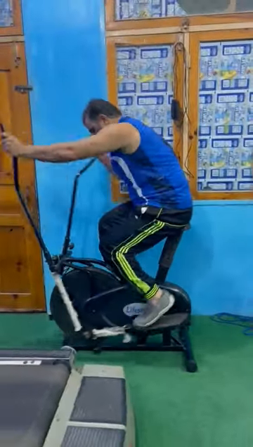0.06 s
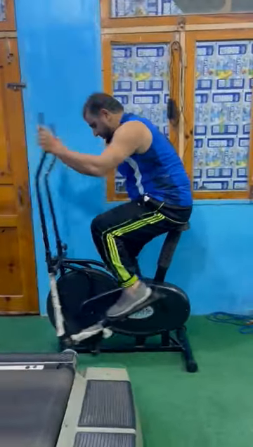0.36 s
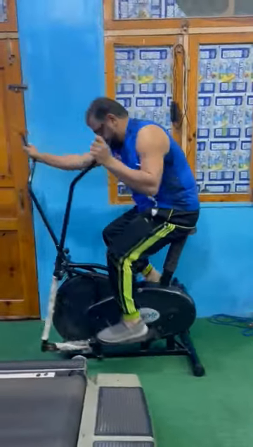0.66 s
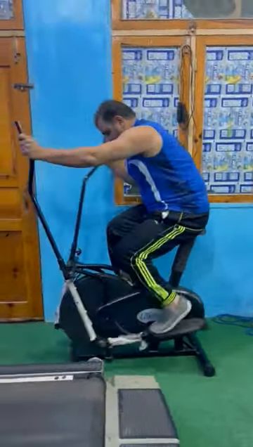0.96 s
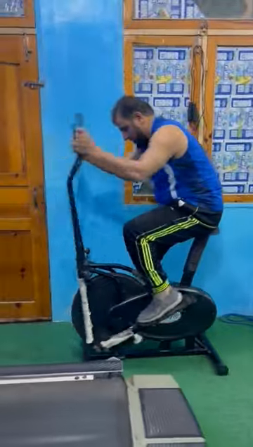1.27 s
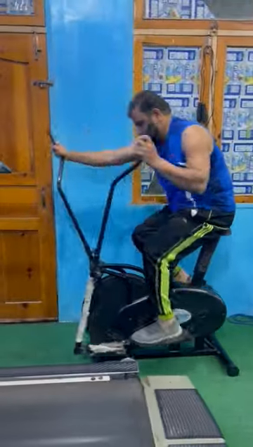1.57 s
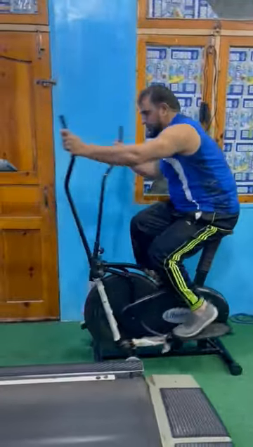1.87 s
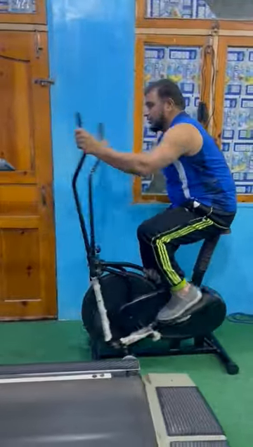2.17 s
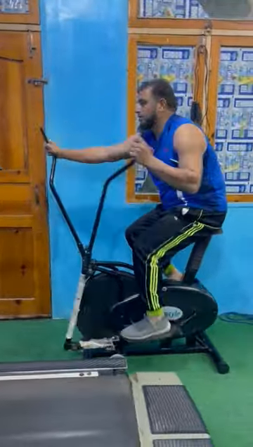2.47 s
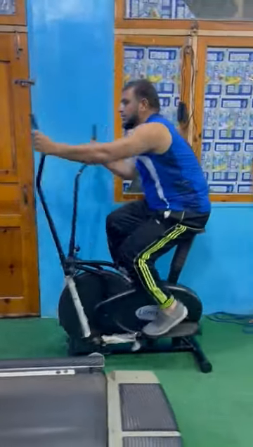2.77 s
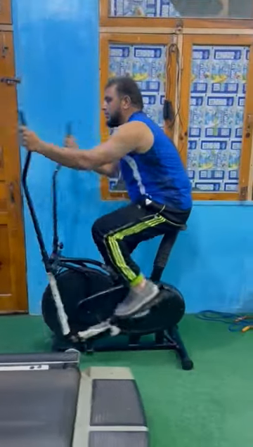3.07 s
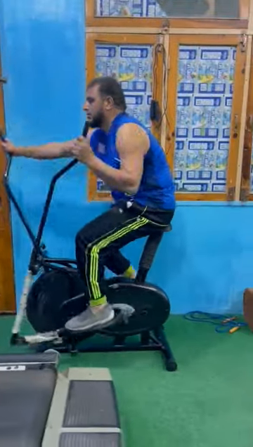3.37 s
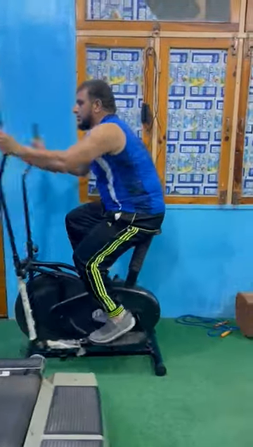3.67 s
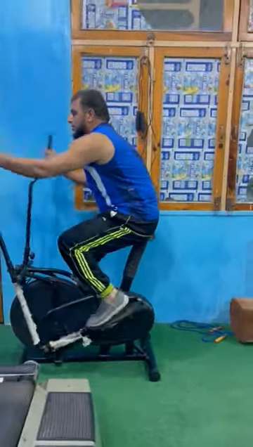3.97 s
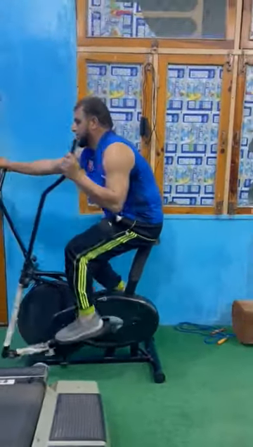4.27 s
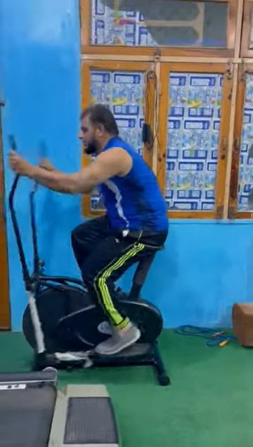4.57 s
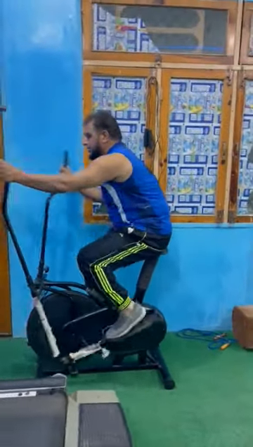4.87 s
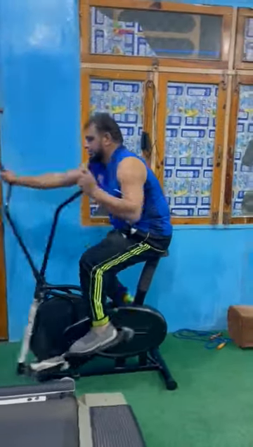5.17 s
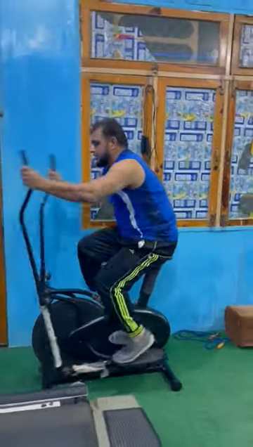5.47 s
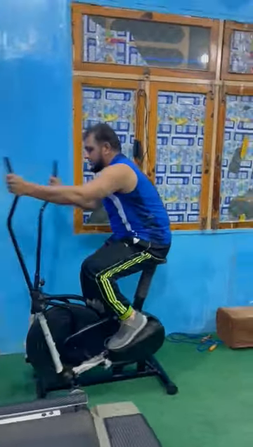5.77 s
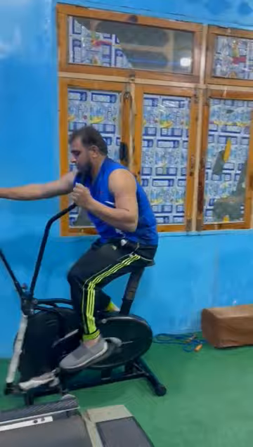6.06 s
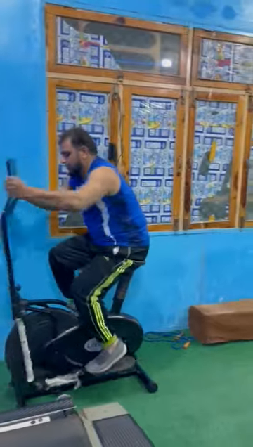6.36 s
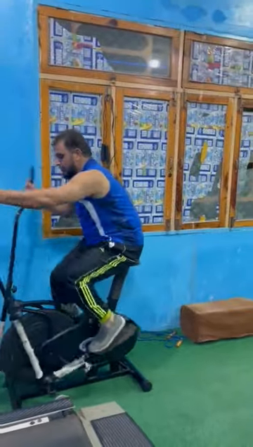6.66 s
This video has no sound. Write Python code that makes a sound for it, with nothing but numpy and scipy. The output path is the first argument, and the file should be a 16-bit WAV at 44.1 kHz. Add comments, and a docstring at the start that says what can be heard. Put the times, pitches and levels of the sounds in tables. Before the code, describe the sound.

An exercise bike is pedalled steadily in a small gym, its flywheel whirring with rapid scrapes, ticks and occasional knocks.

```python
"""Exercise bike in a small gym

Steady pedalling, close to a stereo microphone pair; the flywheel turns nearly seven times a second.
On every turn the out-of-true rim scrapes the brake strap and the drive ticks in an uneven four.
The wheel guard clacks, the pedal linkage knocks, the chain rumbles and sizzles, the frame drones.
A short room tail sits behind the bike, and a few small pops sound right at the microphones."""
import sys
import numpy as np
from scipy import signal
from scipy.fft import rfft, irfft, next_fast_len
from scipy.io import wavfile
from scipy.ndimage import uniform_filter1d, map_coordinates

SR = 44100
rng = np.random.default_rng(int(sys.argv[2]) if len(sys.argv) > 2 else 0)


def unload_wav(signal):
    """Save mono or channel-first audio to the path in sys.argv[1] as 16-bit WAV at rate SR, clipped to [-1, 1]."""
    wavfile.write(
        sys.argv[1],
        SR,
        np.round(np.clip(np.atleast_2d(signal).T, -1, 1) * 32767).astype(np.int16),
    )


N = 304683


# how hard the strap bears on the rim: time_s, level_db
STRAP_LEVEL = [(0.0, -36.5), (0.6, -35.5), (1.0, -40.5), (1.2, -36), (1.6, -36), (2.2, -39), (2.5, -34.5),
               (2.7, -38), (3.4, -37.5), (3.7, -36.5), (3.9, -36.5), (5.2, -36.5), (5.9, -39.5),
               (6.9, -37.5)]
# colour of the scrape at the rim: frequency_hz, level_db
SCRAPE_SPECTRUM = [(300, 1), (800, 3.5), (2500, -9.5), (3200, -4), (4500, -5), (5500, -5), (6100, 0.5),
                   (6600, -1.5), (7300, 6), (8100, -4.5), (9500, -25.5), (10600, 4), (11800, -49)]
def strap_scrape():
    """Friction on the strap: a sharp swish at the rim's high spot, a softer one later in the turn."""
    angle = wheel_angle()
    scrape_db, = curves(STRAP_LEVEL)
    high_spot = rim_pressure(angle, centre_turns=0, width_turns=0.086)
    soft_spot = amp(-9.5) * rim_pressure(angle, centre_turns=0.4, width_turns=0.17)
    grit = unit(amp(0.49 * wobble(980)))
    friction = flickering_noise(depth_db=1.0) * grit * (high_spot + soft_spot)
    return coloured(friction * amp(scrape_db), SCRAPE_SPECTRUM)


def rim_pressure(angle, centre_turns, width_turns):
    """A bump on the rim presses into the strap once a turn."""
    return np.exp(-np.abs((angle - centre_turns + .5) % 1 - .5) / width_turns)


# pace of the flywheel: time_s, turns_per_s
WHEEL_SPEED = [(0.0, 6.613), (1.67, 6.801), (1.95, 6.228), (2.34, 6.945), (2.62, 6.492), (3.97, 6.375),
               (4.26, 7.062), (5.44, 6.781), (6.9, 6.773)]
def wheel_angle(start_turns=-.624, turns_per_push=3.08, surge_turns=0.0261):
    """Flywheel angle in turns, surging with each push of a leg; whole numbers fall on the scrapes."""
    speed, = curves(WHEEL_SPEED)
    angle = start_turns + np.cumsum(speed) / SR
    leg_force = -np.cos(2 * np.pi * angle / turns_per_push)  # -1 at the pedals' dead points
    return angle + surge_turns * leg_force


# the four ticks of one turn: after_scrape_turns, offset_db
TICK_PATTERN = [(-.143, 1), (.035, -6), (.455, -5), (.57, -8.5)]
# how hard the drive ticks: time_s, level_db
TICK_FORCE = [(0, -41.5), (.6, -34.5), (1.5, -35.5), (2.2, -34.5), (3.1, -37.5), (3.5, -38), (3.9, -35.5),
              (4.2, -36.5), (4.6, -36.5), (5.1, -37), (5.8, -36.5), (6.3, -37.5), (6.9, -34.5)]
# colour of the noise in a tick or a clack: frequency_hz, level_db
CONTACT_SPECTRUM = [(150, -18), (450, -0.5), (900, -3.5), (1450, 2.5), (1850, -8), (2200, -8.5),
                    (3200, -13), (4500, -19), (6000, -14), (9500, -54), (12000, -62)]
# resonances of the guard beside the wheel: pitch_hz, width_hz, level_db
GUARD_MODES = [(770, 82, -3), (1134, 130, -3.5), (1448, 103, -4), (1794, 111, -1), (1933, 133, -1),
               (2470, 114, -2.5), (3930, 180, -4.5)]
def drive_ticks(scatter_s=0.000984, scatter_db=1.3):
    """Four short rattles a turn ring the wheel guard, the strongest just ahead of the scrape."""
    angle = wheel_angle()
    after_scrape, offset_db = np.transpose(TICK_PATTERN)
    turns = np.arange(int(angle[-1]) + 1)[:, None] + after_scrape
    times = np.interp(turns, angle, np.arange(N) / SR) + rng.normal(0, scatter_s, turns.shape)
    force_db = np.interp(times, *np.transpose(TICK_FORCE))
    levels_db = force_db + offset_db + rng.normal(0, scatter_db, turns.shape)
    times, levels_db = times.ravel(), levels_db.ravel()
    rattle = coloured(white() * blows(times, levels_db, rise_s=0.004, t60_s=0.094), CONTACT_SPECTRUM)
    ring = struck(GUARD_MODES, times, levels_db, rise_s=0.002)
    return amp(1) * rattle + shared(amp(4.5) * ring)


# slaps of the guard on its bracket: start_s, level_db
GUARD_SLAPS = [(0.909, -37), (1.567, -36), (1.648, -33), (2.114, -36), (2.325, -34), (2.62, -33),
               (2.715, -35), (3.085, -34.5), (3.243, -30.5), (3.637, -35), (3.701, -32), (3.804, -36),
               (4.976, -34), (5.345, -34), (5.764, -32.5), (6.206, -31.5)]
def guard_clacks(rebound_s=0.002705, rebound_db=-5):
    """The loose wheel guard slaps its bracket, rebounds and rings briefly."""
    start_s, slap_db = np.transpose(GUARD_SLAPS)
    times = np.concatenate([start_s, start_s + rebound_s])
    levels_db = np.concatenate([slap_db, slap_db + rebound_db])
    crack = coloured(white() * blows(times, levels_db, rise_s=0.00065, t60_s=0.056), CONTACT_SPECTRUM)
    ring = struck(GUARD_MODES, times, levels_db, rise_s=0.0014)
    return amp(-5.5) * crack + shared(amp(-1) * ring)


# knocks down at the pedal linkage: start_s, level_db, centre_hz, t60_s, rattle_db
LINKAGE_KNOCKS = [(.348, -30.5, 312, 0.3, -6), (0.477, -37, 365, .15, -3), (.802, -27.5, 399, 0.11, -2),
                  (.897, -29, 365, 0.11, -6), (.944, -27.5, 335, 0.083, -3), (.953, -24, 226, .2, -13),
                  (0.976, -27, 108, 0.19, -13), (1.005, -30, 178, 0.18, -15), (1.624, -34, 406, 0.16, -3),
                  (1.861, -35, 430, 0.13, -5), (2.445, -38.5, 440, .3, -6), (2.741, -26.5, 560, 0.23, 1),
                  (2.755, -28, 170, 0.18, -10), (2.782, -29, 226, 0.12, -4), (2.835, -36, 365, 0.22, -5),
                  (3.697, -27.5, 335, 0.16, -0.5), (3.726, -27, 433, 0.16, -14),
                  (3.732, -25.5, 226, 0.2, -7), (3.758, -28, 125, 0.14, -5), (3.825, -31, 430, 0.21, -17),
                  (4.146, -36, 312, 0.13, -7), (4.585, -35, 357, 0.2, -4), (5.561, -34.5, 430, 0.15, -3),
                  (5.774, -17.5, 594, 0.071, -8.5), (5.78, -20.5, 288, 0.092, -7),
                  (5.836, -32, 108, .15, -6), (5.897, -32, 312, 0.26, -2.5),
                  (6.056, -18.5, 468, 0.048, -10), (6.385, -27.5, 332, 0.052, -2)]
# colour of a knock's rattle: frequency_hz, level_db
KNOCK_SPECTRUM = [(40, -41), (90, -0.5), (170, 5), (300, -0.5), (430, 1), (600, -6.5), (850, -6.5),
                  (1500, -13), (3000, -19.5), (9000, -40.5)]
# what a knock can ring in the frame: pitch_hz, level_db
KNOCKED_FRAME_MODES = [(108, -7), (158, -2), (178, -12), (226, -6.5), (312, -1.5), (365, -1), (430, 2),
                       (515, -2), (780, -6)]
def pedal_knocks(reach_octaves=0.097, rise_s=0.0012):
    """Slack in the pedal arms is taken up with a dull, rattling clunk that leaves the frame ringing."""
    t = np.arange(SR // 2) / SR
    colour = unit(amp(along(KNOCK_SPECTRUM, np.fft.rfftfreq(len(t), 1 / SR))))
    mode_hz, mode_db = np.transpose(KNOCKED_FRAME_MODES)
    tones = np.sin(2 * np.pi * mode_hz[:, None] * t)
    out = np.zeros((2, N + SR))
    for start_s, level_db, centre_hz, t60_s, rattle_db in LINKAGE_KNOCKS:
        rattle = irfft(rfft(rng.standard_normal((2, len(t)))) * colour, len(t))
        reach_db = -10 * np.log10(1 + (np.log2(mode_hz / centre_hz) / reach_octaves) ** 4)
        ring = amp(mode_db + reach_db) @ tones  # modes near the centre ring most
        envelope = (1 - np.exp(-t / rise_s)) * amp(level_db - 60 * t / t60_s)
        out[:, round(start_s * SR):][:, :len(t)] += envelope * (amp(rattle_db) * rattle + shared(ring))
    return out[:, :N]


# load on the chain: time_s, level_db
CHAIN_LOAD = [(0, -44.5), (.4, -42.5), (.9, -42.5), (1.3, -45), (1.75, -41), (2.2, -44), (2.8, -42),
              (3.2, -44.5), (3.6, -43.5), (3.85, -41), (4.3, -43), (4.7, -45), (5.2, -47.5), (5.6, -43.5),
              (5.9, -42.5), (6.3, -44.5), (6.9, -42)]
# the chain heard through its casing: frequency_hz, level_db
CASING_SPECTRUM = [(20, -22), (42, -30), (62, -7), (100, -6), (150, 2), (210, -1.5), (270, -1.5), (400, 1),
                   (560, -10.5), (800, -6), (1500, -36), (4000, -68)]
def chain_rumble():
    """Links jolt the casing, louder as the load grows."""
    load_db, = curves(CHAIN_LOAD)
    jolts = unit(amp(1.5 * wobble(130)))
    return amp(load_db + 3.0) * coloured(white() * jolts, CASING_SPECTRUM)


# the frame's weak resonances: pitch_hz, width_hz, level_db
WEAK_FRAME_MODES = [(54.4, 4.6, -6.5), (107, 5.8, 1.5), (125, 6.8, -4), (206.5, 23, -4), (427, 21, -6),
                    (499.5, 4.3, -1), (740, 6.4, -7.5)]
# its three strong ones: pitch_hz, width_hz, sag_hz_per_db, shudder_db
STRONG_FRAME_MODES = [(75.2, 3, 0, 2.5), (178.7, 10, .5, 3), (314.1, 2.7, 0, 2.5)]
# swell of the low, middle and high drone: time_s, level_db
LOW_SWELL = [(0.0, -47), (0.8, -52.5), (1.37, -40.5), (1.68, -55), (2.04, -40.5), (2.62, -64),
             (3.07, -48.5), (3.51, -49.5), (3.78, -39), (4.44, -54), (4.71, -40), (4.98, -49.5),
             (5.21, -44.5), (5.42, -64.5), (5.56, -44.5), (6.3, -53), (6.6, -41), (6.9, -47)]
MID_SWELL = [(0.0, -38.5), (0.27, -38), (0.5, -55.5), (1.0, -38), (1.45, -48), (1.63, -35.5), (1.74, -51),
             (1.83, -38), (2.07, -37), (2.22, -49.5), (2.4, -46), (2.52, -35.5), (2.87, -37), (3.0, -47),
             (3.12, -42.5), (3.73, -43), (4.35, -52.5), (4.58, -40.5), (4.85, -56), (5.2, -57), (5.36, -42),
             (5.82, -40.5), (6.03, -56), (6.17, -40), (6.4, -48.5), (6.75, -43.5), (6.9, -53.5)]
HIGH_SWELL = [(0.0, -54), (0.23, -44), (1.02, -44.5), (1.32, -55), (2.4, -41.5), (2.49, -54), (3.32, -43.5),
              (4.5, -42.5), (4.6, -52), (5.66, -63), (5.76, -39), (6.73, -49.5), (6.9, -41)]
def frame_drone():
    """Three strong resonances of the frame swell, shudder and fade over a bed of weaker ones."""
    bed = amp(-45.5) * ringing(WEAK_FRAME_MODES)
    drone = np.zeros(N)
    swells = (LOW_SWELL, MID_SWELL, HIGH_SWELL)
    for (pitch_hz, width_hz, sag_hz_per_db, shudder_db), swell in zip(STRONG_FRAME_MODES, swells):
        level_db, = curves(swell)
        sagged_hz = pitch_hz - sag_hz_per_db * (level_db - level_db.mean())
        wander = 1.37 * wobble(width_hz * 1.5)  # spreads the tone over the width of its resonance
        phase = 2 * np.pi * np.cumsum(sagged_hz) / SR + wander
        shudder = unit(amp(shudder_db * wobble(35)))
        drone += amp(level_db + 1.05) * shudder * np.sin(phase)
    return bed + shared(drone)


# the chain's fine treble: frequency_hz, level_db
SIZZLE_SPECTRUM = [(5500, -36), (7400, -11), (8000, -4.5), (8700, -1.5), (9900, 0), (10600, -2.5),
                   (11100, -8), (11700, -18)]
def chain_sizzle():
    """The running chain gives off a high sizzle that flutters as its links seat."""
    flutter = unit(amp(2.5 * wobble(70) + 0.31 * wobble(700)))
    return amp(-43.5) * coloured(flickering_noise(depth_db=5) * flutter, SIZZLE_SPECTRUM)


# the rush behind the scrapes: frequency_hz, level_db
RUSH_SPECTRUM = [(200, -27), (500, 2), (800, -6), (1000, 0.5), (1400, -2), (1800, -5.5), (2500, -3.5),
                 (3100, -12.5), (4200, -9), (4900, -17), (5500, -10.5), (7200, -12.5), (9500, -56),
                 (11800, -56)]
def wheel_whir():
    """The wheel rushes under its strap, swaying a little with each turn; the guard sings along."""
    sway_db = 0.51 * np.cos(2 * np.pi * (wheel_angle() - .8))
    rush = coloured(flickering_noise(depth_db=2.2), RUSH_SPECTRUM)
    return amp(sway_db) * (amp(-44.0) * rush + amp(-56.5) * ringing(GUARD_MODES))


# small pops right at the microphones: start_s, level_db
CLOSE_POPS = [(.016, -17), (.055, -17.5), (.149, -21), (.856, -17), (1.005, -17), (2.81, -16), (2.864, -19),
              (5.279, -23), (5.331, -22)]
def close_pops(start_hz=1400, first_octave_s=.0016, rise_s=0.00063, t60_s=.035):
    """Brief pops that drop steeply in pitch, opposite in polarity left and right."""
    t = np.arange(SR // 20) / SR
    phase = 2 * np.pi * np.cumsum(start_hz / (1 + t / first_octave_s)) / SR
    pop = np.sin(phase) * (1 - np.exp(-t / rise_s)) * amp(-60 * t / t60_s)
    out = np.zeros(N + SR)
    for start_s, level_db in CLOSE_POPS:
        out[round(start_s * SR):][:len(t)] += amp(level_db) * pop
    return np.array([out[:N], -out[:N]])


# decay of the room around the bike: frequency_hz, t60_s
GYM_DECAY = [(150, 0.56), (1500, 0.22), (10000, 0.24)]
def gym_reverb(x):
    """The room's tail; the bass lasts longest, and the echoes keep changing from moment to moment."""
    wet = np.zeros((2, N + SR))
    block, predelay = SR // 3, SR // 150
    for start in range(0, N, block):  # fresh echoes for each block
        hz, t, noise = signal.stft(rng.standard_normal((2, SR // 3)), SR, nperseg=256)
        decay = amp(-60 * t / along(GYM_DECAY, hz)[:, None])
        tail = signal.istft(noise * decay, SR, nperseg=256)[1]
        tail = np.pad(tail, ((0, 0), (predelay, 0)))
        echo = signal.fftconvolve(x[:, start:start + block], tail / np.linalg.norm(tail[0]), axes=1)
        wet[:, start:start + echo.shape[1]] += echo
    return wet[:, :N]


def blows(times, levels_db, rise_s, t60_s):
    """Envelope of contacts that swell quickly and die away."""
    t = np.arange(SR // 3) / SR
    shape = (1 - np.exp(-t / rise_s)) * amp(-60 * t / t60_s)
    onsets = np.clip(np.round(times * SR), 0, N).astype(int)
    power = np.bincount(onsets, amp(levels_db) ** 2, N + 1)
    return np.sqrt(np.abs(signal.fftconvolve(power, shape ** 2)[:N]))


def struck(modes, times, levels_db, rise_s):
    """Damped tones; every strike shares its force anew among the modes."""
    t = np.arange(SR // 25) / SR
    pitch_hz, width_hz, mode_db = np.transpose(modes)
    envelopes = np.exp(-np.pi * width_hz[:, None] * t) * (1 - np.exp(-t / rise_s))
    tones = np.sin(2 * np.pi * pitch_hz[:, None] * t) * envelopes
    scatter_db = rng.normal(0, 3.6, (len(times), len(modes)))
    strikes = amp(levels_db[:, None] + mode_db + scatter_db) @ tones
    samples = np.round(times * SR).astype(int)[:, None] + np.arange(len(t))
    return np.bincount(np.clip(samples, 0, N).ravel(), strikes.ravel(), N + 1)[:N]


def ringing(modes):
    """Resonances kept ringing by random jolts, rms 1."""
    def response(hz):
        peaks = sum((-1) ** k * amp(db) * 1j * hz * width / (pitch ** 2 - hz ** 2 + 1j * hz * width)
                    for k, (pitch, width, db) in enumerate(modes))
        return peaks * np.abs(peaks) ** .5  # sharpens the peaks
    return unit(filtered(white(), response))


def flickering_noise(depth_db):
    """Noise whose colour flickers from moment to moment."""
    spectra = signal.stft(white(), nperseg=512)[2]
    patches = uniform_filter1d(rng.standard_normal(spectra.shape[1:]), size=9, axis=0)  # over frequency
    patches = uniform_filter1d(patches, size=7, axis=1)  # over time
    gain = amp(depth_db * np.clip(unit(patches), -2, 2))
    return unit(signal.istft(spectra * gain, nperseg=512)[1][:, :N])


def white():
    """Two unrelated noises, one for each part of the sound field."""
    return rng.standard_normal((2, N))


def shared(x):
    """Puts a sound in the part of the field that both microphones share."""
    return np.array([x, np.zeros_like(x)])


def wobble(rate):
    """A smooth random curve, rate knots a second."""
    return map_coordinates(rng.standard_normal(int(N * rate / SR) + 4), [np.arange(N) * rate / SR])


def coloured(x, spectrum):
    """x shaped by a spectrum; white noise keeps its power."""
    return filtered(x, lambda hz: unit(amp(along(spectrum, hz))))


def filtered(x, response):
    """x times a response of frequency."""
    size = next_fast_len(N + SR // 2)
    return irfft(rfft(x, size) * response(np.fft.rfftfreq(size, 1 / SR)), size)[..., :N]


def along(rows, hz):
    """Each column after the frequency, read at hz on a log axis."""
    row_hz, *columns = np.transpose(rows)
    return np.squeeze([np.interp(np.log(hz + 1), np.log(row_hz + 1), c) for c in columns])


def curves(rows):
    """One value per sample for each column after the time."""
    time_s, *columns = np.transpose(rows)
    return [np.interp(np.arange(N) / SR, time_s, c) for c in columns]


def amp(db):
    """Decibels to gain."""
    return 10 ** (np.asarray(db) / 20)


def unit(x):
    """Scaled to rms 1."""
    return x / np.sqrt(np.mean(x ** 2) + 1e-20)


def scene():
    """The bike as a field in two parts: one the microphones share, one that sets them apart."""
    contacts = strap_scrape() + drive_ticks() + guard_clacks() + pedal_knocks()
    room = amp(-6.0) * gym_reverb(contacts)
    return contacts + room + wheel_whir() + chain_sizzle() + chain_rumble() + frame_drone()


# the microphone pair by the bike: frequency_hz, coherence, left_lead_rad, left_over_right_db
MICROPHONE_PAIR = [(100, .99, 0, 0), (300, .82, .05, 2), (600, .4, .6, 4), (900, .22, .3, 4.2),
                   (1300, .5, -.1, 2.5), (1800, .97, 0, 0), (2700, .38, .8, 0), (4200, .36, 1.5, 0),
                   (4850, .98, 3.1, 0), (5170, .45, 4.4, 0), (5450, .98, 6.25, 0), (6400, .99, 6.3, 0),
                   (7000, .72, 7.2, 0), (7700, .75, 8.8, 0), (8400, .999, 9.42, 0), (9550, .999, 9.42, 0),
                   (10500, .65, 10.2, 0), (11000, .45, 11.3, 0), (11300, .95, 12.5, 0)]
def record(dry, top_hz=11700):
    """The pair blends, delays and tilts the field by frequency and picks up the pops, all below top_hz."""
    def pickup(hz):
        coherence, lead_rad, tilt_db = along(MICROPHONE_PAIR, hz)
        blend = np.arccos(np.clip(coherence, 0, 1)) / 2
        common, apart = np.cos(blend), np.sin(blend)
        left = amp(tilt_db / 2) * np.exp(.5j * lead_rad)
        return np.array([[common * left, apart * left], [common / left, -apart / left]])
    stereo = filtered(dry, pickup).sum(axis=1)
    return filtered(stereo + close_pops(), lambda hz: hz < top_hz)


dry = scene()
out = record(dry)
unload_wav(out)
```